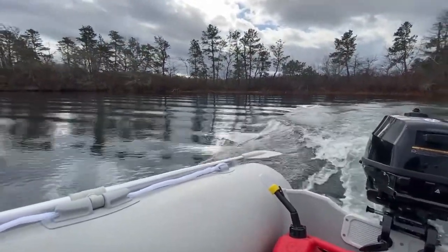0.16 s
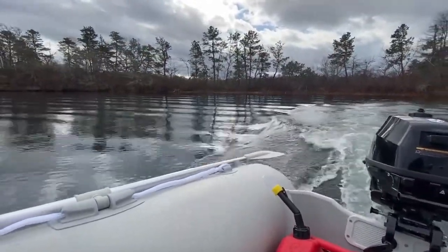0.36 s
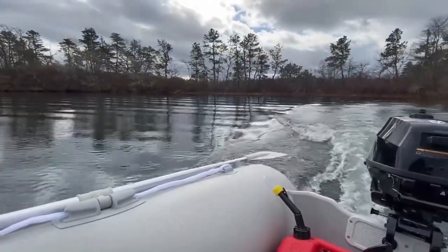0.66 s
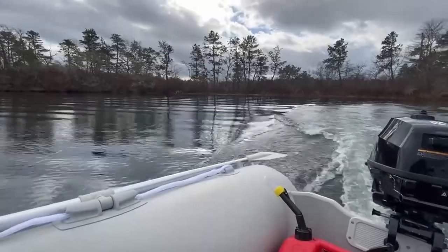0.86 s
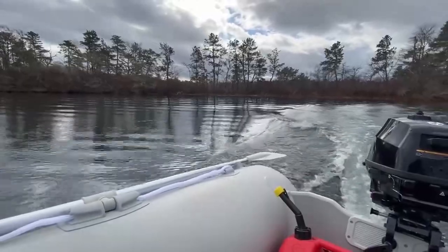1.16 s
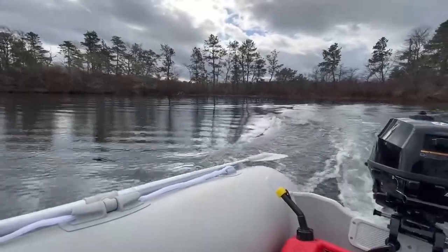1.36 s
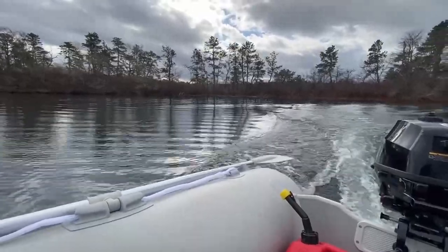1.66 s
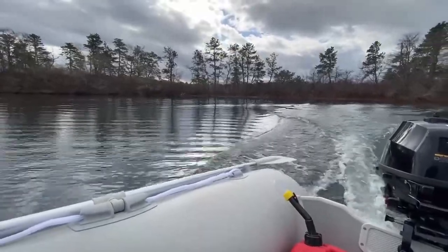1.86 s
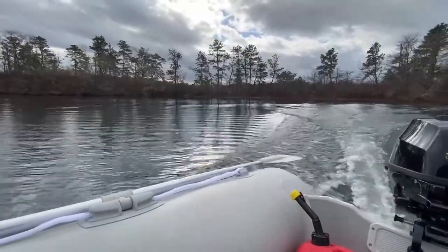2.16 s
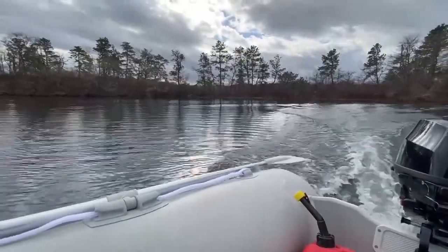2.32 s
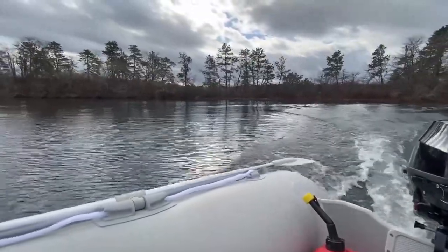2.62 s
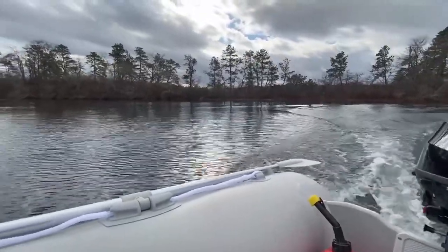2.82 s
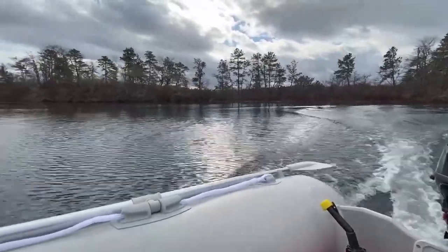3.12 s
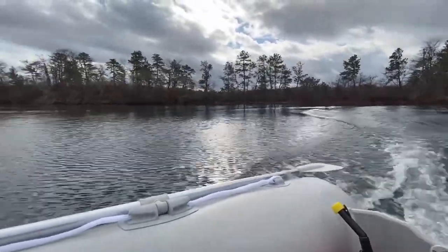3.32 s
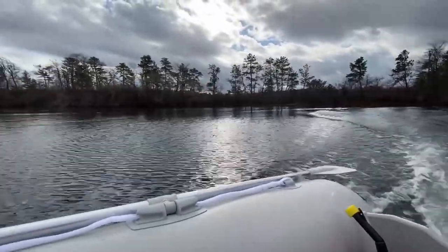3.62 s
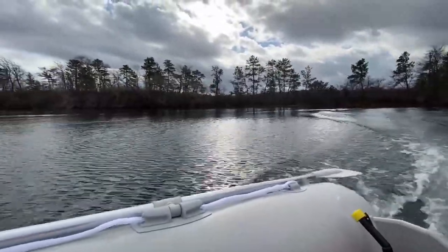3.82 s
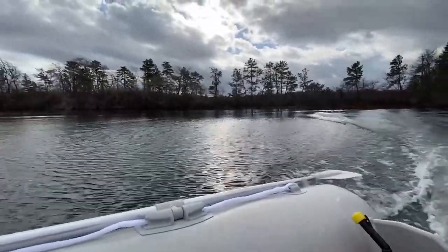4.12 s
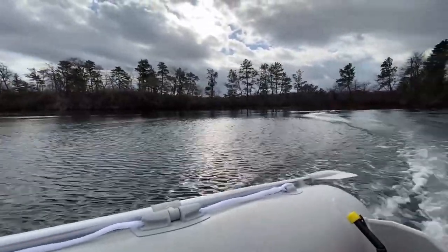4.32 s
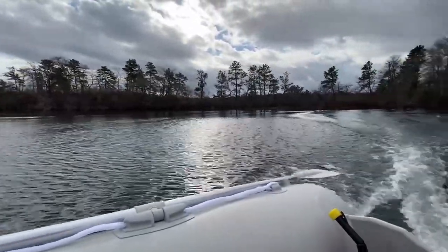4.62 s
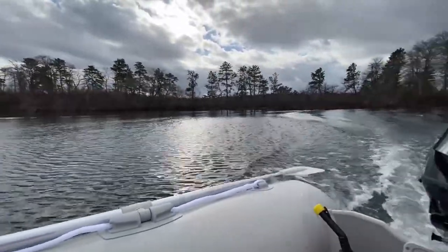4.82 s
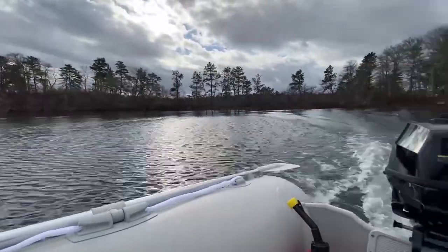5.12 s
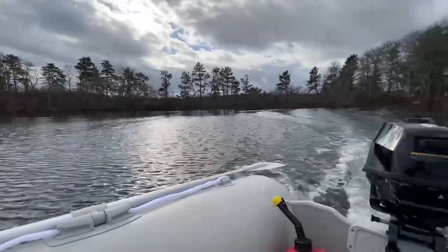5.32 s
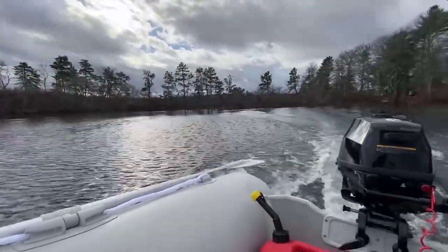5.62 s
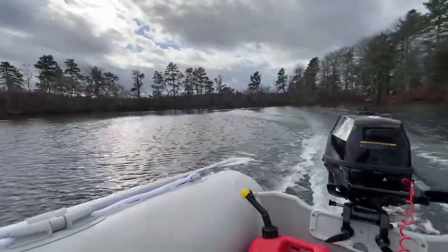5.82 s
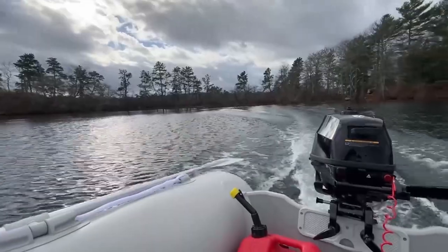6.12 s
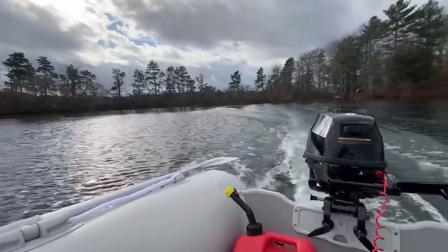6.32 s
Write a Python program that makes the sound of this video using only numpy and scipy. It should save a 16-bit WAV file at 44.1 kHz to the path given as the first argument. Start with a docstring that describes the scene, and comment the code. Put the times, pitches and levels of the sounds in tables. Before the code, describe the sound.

Close, constant outboard engine drone with a fast pulsing exhaust beat, ringing cover and clattery ticks, while churned water fizzes quietly behind it.

```python
"""A single-cylinder outboard runs at about 3100 rpm: harmonics of the crank rate make its exhaust beat.
Once a turn a piston knock rings the cowling modes, and six metallic ticks ring the block as filtered noise.
One metal part sings with a flutter; another zings, swelling to a peak and fading to a fainter ring.
Behind, shaped noise makes the underwater churn and the fizzing wake. As the phone swings aside, then round
to face the motor, the blend of three sets of mode levels shifts the colour."""
import sys
import numpy as np
from scipy import signal
from scipy.fft import rfft, irfft
from scipy.io import wavfile

SR = 44100
rng = np.random.default_rng(int(sys.argv[2]) if len(sys.argv) > 2 else 0)


def dump_mix(stems):
    """Bounce the given channels to the path in sys.argv[1] as a 16-bit WAV at rate SR."""
    frames = np.atleast_2d(stems).T  # one column per channel
    limited = np.clip(frames, -1, 1)  # hard clip at full scale
    pcm = np.round(limited * 32767).astype(np.int16)
    wavfile.write(sys.argv[1], SR, pcm)


N = 285327
TIME_S = np.arange(N) / SR
FREQ_HZ = np.maximum(np.arange(N // 2 + 1) * SR / N, 1)
SIDES = np.array([[1], [-1]])  # left, right
CRUISE_HZ, TOP_HZ = 51.5, 15400

# Motor speed. Each row: time in seconds, crank rate in Hz (turns per second).
CRANK_RATE = [(0.0, 51.48), (0.66, 50.94), (1.32, 49.87), (1.43, 50.41), (2.08, 51.72), (2.41, 50.27),
              (2.63, 51.23), (3.95, 52.21), (4.17, 51.11), (4.39, 52.12), (4.61, 51.5), (4.83, 51.92),
              (4.93, 51.8), (5.15, 52.02), (5.37, 51.4), (5.7, 52.02), (5.81, 51.35), (6.47, 51.73)]
# Phone direction. Each row: time in seconds, direction (-1 facing motor, 0 past its flank, 1 aside).
PHONE_TURN = [(0, -0.23), (.9, -0.26), (2.0, 0.2), (2.7, -0.1), (3.4, 0.83), (4.7, 0.76), (5.15, 0.6),
              (5.4, -0.55), (5.7, -1), (6.47, -0.79)]
# Exhaust harmonics. Each row: multiple of the crank rate, level in dB within its group.
EXHAUST_ORDERS = [(1, -30), (2, -0.5), (3, -14.5), (4, -11), (5, -7.5), (6, -13.5), (7, -14.5)]
# Cowling modes. Each row: centre in Hz, width in Hz, left minus right in dB, left lead in radians,
# then relative level in dB past the flank, aside, facing.
COWL_MODES = [(483, 62, -14, 1, -11.5, -11, -11.5), (545.6, 41, -16, 2.5, -16, -15, -13),
              (650, 130, -10, -2, -24.5, -19.5, -22), (729.7, 24, -6.5, -0.5, -13.5, -14.5, -11.5),
              (910, 108, -7.5, -2.5, -24.5, -13, -20), (980, 25.7, 0.5, 2.5, -4.5, -4, -6),
              (1021, 115, 6.5, 0.5, -10, -15, -15), (1072, 22, -4.5, 0.5, -5, -4.5, -7.5),
              (1197.5, 12.8, 11.5, 1.5, -5.5, -11, -6.5), (1236, 26, 16, -2.5, -15, -13.5, -9),
              (1321.5, 21, 0.5, -2.5, 3.5, 3, 0.5), (1394.7, 29, 3, 0.1, -6, -9.5, -2),
              (1464, 140, 3.5, -2, -10.5, -23, -7), (1580, 31, 12, -2.5, -12.5, -8, -3.5),
              (1644, 36, 10, 3.5, -7.5, -12, -7), (1720, 11, 8.5, 2.5, -3.5, -24, -2),
              (1823, 5.2, -15, 0.5, -10.5, -10, -24), (1931, 24.3, 6.5, 3.5, -2, -6.5, -0.5),
              (1943, 37, 8, 4.5, -12, -7.5, -8.5), (2046, 35, 15.5, 4.5, -11, -25, -10.5),
              (2095, 21, 18.5, 3.24, -11.5, -13.5, -17), (2290, 12, 8, 1.5, -14.5, -15, -15),
              (2422, 8.9, 16.5, 3.1, -15, -29, -32)]
# Ticks in one turn. Each row: crank angle in turns, centre in Hz, Gaussian width in octaves,
# band weight in dB, decay in seconds.
TICK_BANDS = [(0.021, 3030, 6.3, -9.5, 0.0014), (0.168, 9200, 0.98, -0.5, 0.0063),
              (0.189, 3230, 0.86, 1.5, 0.0035), (.46, 4200, 0.48, 7, 0.0035),
              (0.589, 5500, 0.5, -4, 0.0078), (.93, 2700, 2.8, -3.5, 0.0012)]
# Block resonances. Each row: centre in Hz, width in Hz, then relative level in dB past the flank,
# aside, facing.
BLOCK_MODES = [(2680, 330, -7, -14.5, -0.5), (3182, 180, -7.5, -1, 2), (3458, 56, -0.5, 9.5, 10),
               (3680, 200, 2, -9, -8), (3930, 560, -3, -1, -5), (4330, 370, 1.5, -11, -19),
               (4700, 196.6, -20, -10, -3), (5220, 520, -7.5, -8.5, -12), (5460, 160, -6, -18, 2),
               (5860, 960, -8.5, -14.5, -6), (6500, 680, -15, -8, -11), (9060, 820, -20, -16.5, -13),
               (10520, 730, -14, -15, -4.5), (14300, 890, -37, -24, -27)]
# Spectrum of the underwater exhaust churn. Each row: frequency in Hz, relative density in dB per Hz.
CHURN_SPECTRUM = [(20, -33), (45, -14.5), (70, -9.5), (130, -5), (200, -10.5), (250, -2.5), (300, 0.5),
                  (350, -3.5), (410, -12.5), (520, -15), (800, -40)]
# Spectrum of the wake wash. Each row: frequency in Hz, relative density in dB per Hz.
WASH_SPECTRUM = [(150, -41), (450, -8), (750, -2), (1100, -5), (2000, 0.5), (2800, -9), (5000, -9),
                 (7500, -18.5), (10500, -15), (12000, -33), (15000, -34)]
# Low sound at the two microphones. Each row: frequency in Hz, left minus right in dB.
LOW_PAN = [(50, 13), (105, 1), (160, -6), (210, -7.5), (260, -3.5), (310, -9), (365, 0), (700, -1)]
# Brief burble swells. Each row: centre in seconds, length in seconds, peak gain in dB.
BURBLE_SWELLS = [(0.078, 0.27, 6), (5.5, 0.34, 4), (6.0, 0.28, 2.5)]

# Level against motor speed, before view and pan. Each: dB at cruise, dB per Hz of crank rate above it.
BEAT_LAW = (-13.5, 0.82)
BOOM_LAW = (-21.1, 1.36)
BURBLE_LAW = (-27, 0.85)
COWL_LOW_LAW = (-25, 0.36)
COWL_HIGH_LAW = (-26, 1.1)
TICK_LAW = (-33, 2.4)
# Level by phone direction. Each: dB past the flank, dB aside, dB facing.
COWL_LOW_VIEW_DB = (0.1, -1.6, -0.2)
COWL_HIGH_VIEW_DB = (0.8, -2.2, -1.1)
TICK_VIEW_DB = (0.5, 0.2, -0.3)
SING_VIEW_DB = (-35, -38, -40.5)
# Tick pan, left minus right. Columns: dB past the flank, dB aside, dB facing.
TICK_PAN_DB = (8, 4.5, 7)


def undb(db):
    """Decibels to amplitude gain."""
    return 10 ** (np.asarray(db) / 20)


def unit(x):
    """Scale to rms 1."""
    return x / np.sqrt(np.mean(x ** 2))


def curve(table):
    """Interpolate (time, value) rows at every sample."""
    time_s, value = np.transpose(table)
    return np.interp(TIME_S, time_s, value)


def colour(points):
    """Gain at every frequency from (Hz, dB) rows, on a log frequency axis."""
    hz, db = np.transpose(points)
    return undb(np.interp(np.log(FREQ_HZ), np.log(hz), db))


def shape(x, response):
    """Filter by a frequency response."""
    return irfft(rfft(x) * response, N)


def mode(hz, width_hz):
    """Response of one damped resonance, gain 1 at its centre."""
    return 1 / (1 + 1j * (FREQ_HZ ** 2 - hz ** 2) / (FREQ_HZ * width_hz))


def walk(rate_hz):
    """Slow random drift of rms 1: noise low-passed at rate_hz."""
    return unit(shape(rng.standard_normal(N), 1 / (1 + (FREQ_HZ / rate_hz) ** 4)))


def strikes(crank, angle_turns, jitter_s, scatter_db):
    """One band-limited pulse a turn at a crank angle, each slightly off in time and force."""
    turns = np.arange(np.ceil(crank[-1])) + angle_turns
    chance = rng.standard_normal((len(turns), 2))
    at = (np.interp(turns, crank, TIME_S) + jitter_s * chance[:, 0]) * SR
    # windowed sinc places each pulse between samples
    taps = at.astype(int)[:, None] + np.arange(-7, 9)
    off = taps - at[:, None]
    pulses = np.sinc(off) * np.sinc(off / 8) * undb(scatter_db * chance[:, 1:])
    inside = (taps >= 0) & (taps < N) & (turns[:, None] < crank[-1])
    return np.bincount(taps[inside], pulses[inside], N)


def gusts(crank, angle_turns, length_turns):
    """Envelope that jumps to 1 at a crank angle, then decays exponentially through the turn."""
    return np.exp(-((crank - angle_turns) % 1) / length_turns)


def lagged(lag_s):
    """Responses of the two microphones when the left hears lag_s later."""
    return np.exp(-1j * np.pi * FREQ_HZ * lag_s * SIDES)


def low_stereo(x, aside, lag_s=0.00013, aside_lag_s=0.000473):
    """Low sound reaches the left later, more so aside; the level difference varies with frequency."""
    pan = colour(LOW_PAN) ** (SIDES / 2)
    near = shape(x, pan * lagged(lag_s))
    far = shape(x, pan * lagged(aside_lag_s))
    return (1 - aside) * near + aside * far


def views(turn):
    """Shares of the three phone directions: past the flank, aside, facing."""
    turn = np.clip(turn, -1, 1)
    return [np.clip(1 - np.abs(turn - way), 0, 1) for way in (0, 1, -1)]


def seen(shares, view_db):
    """Blend three dB values by phone direction."""
    return sum(share * db for share, db in zip(shares, view_db))


def effort(speed_hz, law):
    """Level in dB, rising linearly with crank rate."""
    cruise_db, db_per_hz = law
    return cruise_db + db_per_hz * (speed_hz - CRUISE_HZ)


def wake(wash_db=-31.5, surge_db=0.97, surge_hz=14.0, grain_db=1.5):
    """Drops and bursting bubbles: sparse random impulses, coloured, with a randomly surging level."""
    present = rng.random((2, N)) < .2
    force = rng.standard_normal((2, N))
    size = np.minimum(rng.exponential(size=(2, N)), 4)
    drops = present * force * undb(grain_db * size)
    return unit(shape(drops, colour(WASH_SPECTRUM))) * undb(wash_db + surge_db * walk(surge_hz))


def churn(crank, churn_db):
    """Exhaust gas under water: coloured noise surging at random and pulsed once a turn."""
    pulse = 0.58 + gusts(crank, angle_turns=0.11, length_turns=0.92)
    gas = rng.standard_normal(N) * pulse * undb(2.0 * walk(10.7))
    return unit(shape(gas, colour(CHURN_SPECTRUM))) * undb(churn_db)


def singing(crank, hz, pole_width_hz, angle_turns, pan_db, rough):
    """Lightly damped metal, a squared resonance struck once a turn and shaken by pulsed noise."""
    knock = unit(strikes(crank, angle_turns, jitter_s=.00003, scatter_db=2.5))
    shake = unit(rng.standard_normal(N) * gusts(crank, angle_turns, length_turns=0.33))
    ring = unit(shape(knock + rough * shake, mode(hz, pole_width_hz) ** 2))
    return ring * undb(SIDES * pan_db / 2)


def zing(crank, peak_from_s=4.67, peak_to_s=5.206, attack_s=.3, release_s=.15, peak_db=-43, after_db=-48.5):
    """A thin, evenly pulsed ring rises exponentially, holds, then settles fainter."""
    rise = np.exp(np.minimum(TIME_S - peak_from_s, 0) / attack_s)
    fall = np.exp(-np.maximum(TIME_S - peak_to_s, 0) / release_s)
    ring = singing(crank, hz=5166, pole_width_hz=190, angle_turns=0.51, pan_db=16, rough=0.22)
    return ring * rise * undb(after_db + (peak_db - after_db) * fall)


def singing_part(crank, shares, flutter_db=3.5, flutter_hz=7):
    """A loose metal part rings with a bounded random flutter as its contact varies."""
    contact = undb(flutter_db * np.tanh(walk(flutter_hz)))
    ring = singing(crank, hz=1815.5, pole_width_hz=35, angle_turns=.3, pan_db=1, rough=2.7)
    return ring * contact * undb(seen(shares, SING_VIEW_DB))


def ticks(crank, speed_hz, shares, loose=.14, likeness=.55, tail=.15):
    """Metallic ticks ring the block: part alike every turn, part rattling afresh."""
    tick_db = effort(speed_hz, TICK_LAW) + seen(shares, TICK_VIEW_DB)
    pan_db = seen(shares, TICK_PAN_DB)
    bands = [undb(db) * np.exp(-.5 * (np.log2(FREQ_HZ / hz) / octaves) ** 2)
             for _, hz, octaves, db, _ in TICK_BANDS]
    total = np.sqrt(sum(b ** 2 for b in bands)) + 1e-9
    short_s = TIME_S[:2048]
    clatter = 0
    for (angle, _, _, _, decay_s), band in zip(TICK_BANDS, bands):
        hits = strikes(crank, angle, jitter_s=.00001, scatter_db=1.5)
        fade = np.exp(-short_s / decay_s) + tail * np.exp(-short_s / .011)
        grain = fade * rng.standard_normal((2, 2048))
        alike = signal.oaconvolve(hits[None], grain, axes=1)[:, :N]
        afresh = signal.oaconvolve(hits, fade)[:N] * rng.standard_normal((2, N))
        tick = np.sqrt(1 - loose) * unit(alike) + np.sqrt(loose) * unit(afresh)
        clatter = clatter + rfft(tick) * band / total
    # shared part plus a smaller opposed part
    shared = np.sqrt(1 + likeness) * clatter[0]
    opposed = SIDES * np.sqrt(1 - likeness) * clatter[1]
    clatter = (shared + opposed) * lagged(0.000412)
    # tilt toward the right above about 7 kHz, ahead of the view pan
    clatter = clatter * undb(SIDES * -2.8 / (1 + (7000 / FREQ_HZ) ** 8))
    clatter = clatter / (1 + (2100 / FREQ_HZ) ** 12) / (1 + (FREQ_HZ / 13500) ** 12)
    hz, width_hz, *levels_db = np.transpose(BLOCK_MODES)
    peaks = np.array([np.abs(mode(f, w)) ** 4 for f, w in zip(hz, width_hz)])
    out = 0
    for share, db in zip(shares, levels_db):
        block = np.sqrt(undb(2 * db) @ peaks)  # mode powers add
        out = out + share * unit(irfft(clatter * block, N))
    return out * undb(tick_db + SIDES * pan_db / 2)


def cowling(crank, speed_hz, shares, split_hz=1500, scrape_db=-7.5):
    """Piston knock and the scrape after it ring the cover; each mode radiates its own way."""
    low_db = effort(speed_hz, COWL_LOW_LAW) + seen(shares, COWL_LOW_VIEW_DB)
    high_db = effort(speed_hz, COWL_HIGH_LAW) + seen(shares, COWL_HIGH_VIEW_DB)
    knock = unit(strikes(crank, angle_turns=0.1199, jitter_s=.00002, scatter_db=0.6))
    scrape_gate = .3 + gusts(crank, angle_turns=0.17, length_turns=0.36)
    scrape = unit(rng.standard_normal(N) * scrape_gate)
    push = rfft(knock + undb(scrape_db) * scrape)
    push = push / (1 + (330 / FREQ_HZ) ** 6) / (1 + (FREQ_HZ / 2900) ** 8)
    hz, width_hz, pan_db, lead_rad, *levels_db = np.transpose(COWL_MODES)
    # neighbouring modes alternate in sign
    modes = np.array([(-1) ** k * mode(hz[k], width_hz[k]) for k in range(len(hz))])
    ports = undb(SIDES * pan_db / 2) * np.exp(.5j * SIDES * lead_rad)
    lower = 1 / (1 + (FREQ_HZ / split_hz) ** 20)
    low, high = 0, 0
    for share, db in zip(shares, levels_db):
        ring = push * ((ports * undb(db)) @ modes)
        low = low + share * unit(irfft(ring * lower, N))
        high = high + share * unit(irfft(ring * (1 - lower), N))
    return low * undb(low_db) + high * undb(high_db)


def exhaust(crank, speed_hz, aside, hull_hz=285, hull_width_hz=25):
    """Harmonics of the crank: a clean beat led by order 2, a wavering boom and burble, and gas churn."""
    boom_db = effort(speed_hz, BOOM_LAW)
    burble_db = effort(speed_hz, BURBLE_LAW)
    for centre_s, length_s, db in BURBLE_SWELLS:
        burble_db = burble_db + db * np.exp(-(2 * (TIME_S - centre_s) / length_s) ** 2)
    hull = mode(hull_hz, hull_width_hz)
    beat, boom, burble = 0, 0, 0
    for order, db in EXHAUST_ORDERS:
        order = round(order)
        # orders above the hull resonance arrive turned over; the bin is the order's mean frequency
        lag_rad = np.angle(hull[int(order * crank[-1])])
        line = -undb(db) * np.cos(2 * np.pi * order * (crank + 0.1476) + lag_rad)
        if order <= 3:
            waver_db = .25 if order == 2 else 1.1
            beat = beat + line * undb(waver_db * walk(12))
        elif order <= 5:
            boom = boom + line * undb(1.0 * walk(12))
        else:
            burble = burble + line * undb(2.26 * walk(17))
    tones = unit(beat) * undb(effort(speed_hz, BEAT_LAW))
    tones = tones + unit(boom) * undb(boom_db) + unit(burble) * undb(burble_db)
    gas = churn(crank, churn_db=-5.0 + (boom_db + burble_db) / 2)
    return low_stereo(tones + gas, aside)


def scene():
    """One crank angle times every motor part; its rate sets exhaust, cowling and tick levels."""
    shares = views(curve(PHONE_TURN))
    speed_hz = curve(CRANK_RATE)
    crank = np.cumsum(speed_hz * (1 + 0.001321 * walk(9.05))) / SR  # turns
    background = wake() + zing(crank) + singing_part(crank, shares)
    motor = ticks(crank, speed_hz, shares) + cowling(crank, speed_hz, shares)
    return background + motor + exhaust(crank, speed_hz, aside=shares[1])


def record(dry):
    """The phone cuts the top: a steep elliptic low-pass."""
    return signal.sosfilt(signal.ellip(8, .2, 70, TOP_HZ, fs=SR, output="sos"), dry)


dry = scene()
out = record(dry)
dump_mix(out)
```